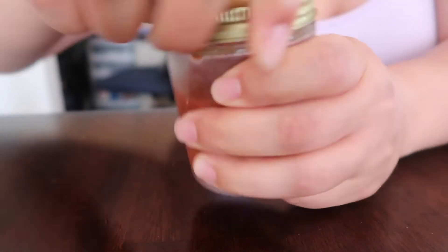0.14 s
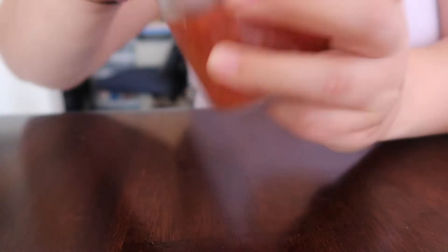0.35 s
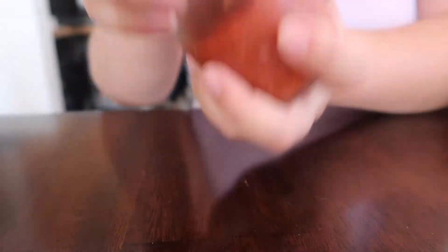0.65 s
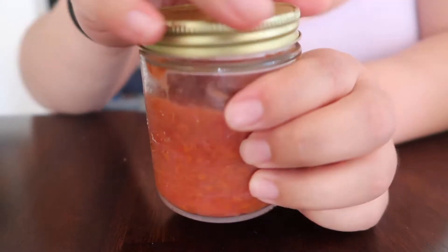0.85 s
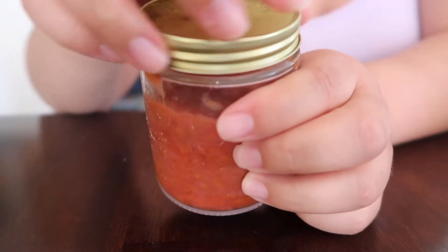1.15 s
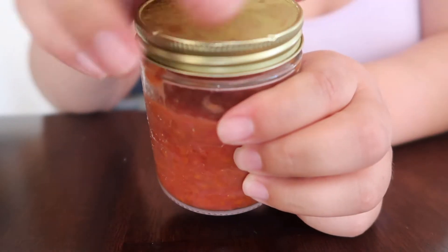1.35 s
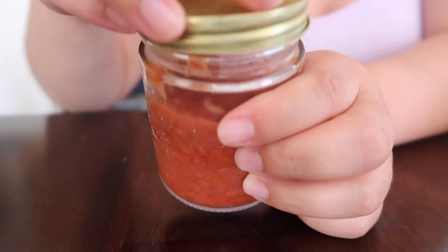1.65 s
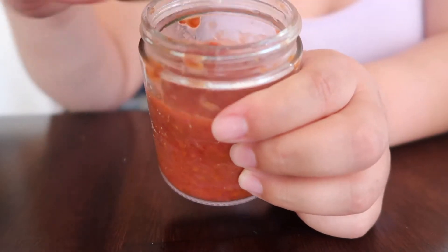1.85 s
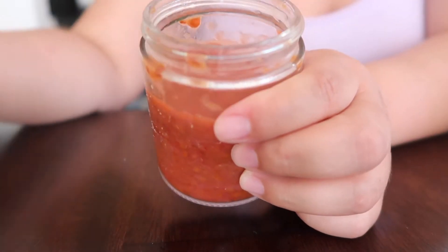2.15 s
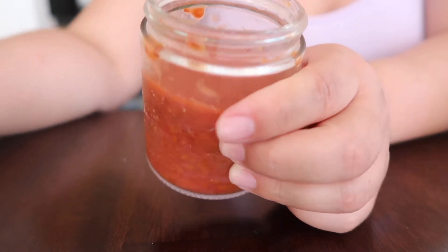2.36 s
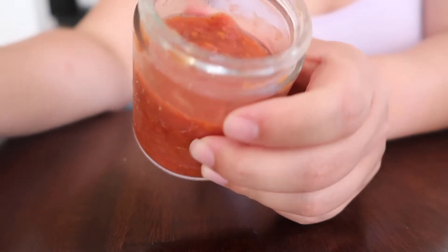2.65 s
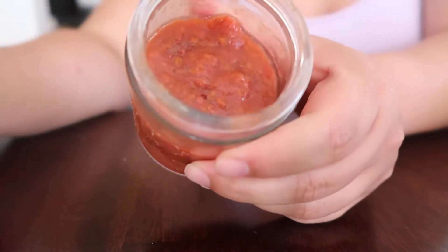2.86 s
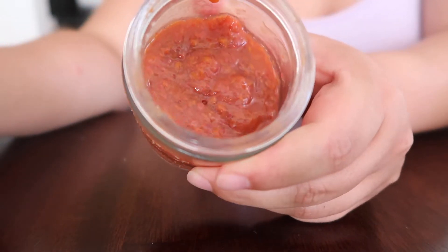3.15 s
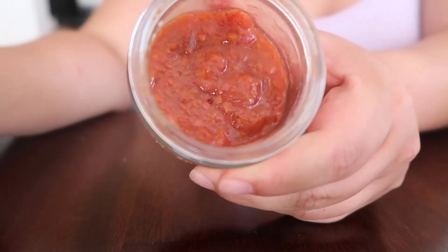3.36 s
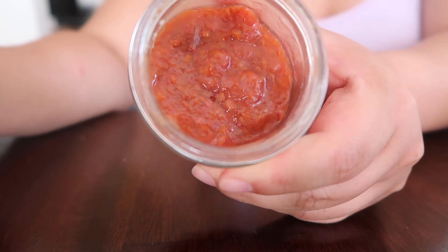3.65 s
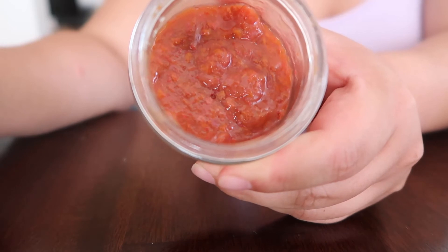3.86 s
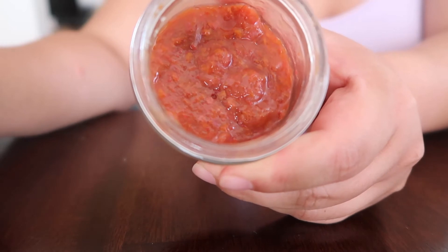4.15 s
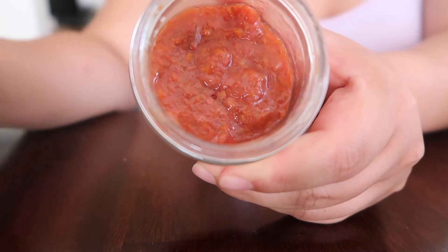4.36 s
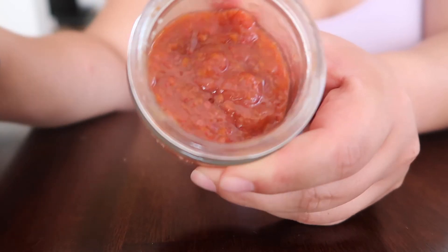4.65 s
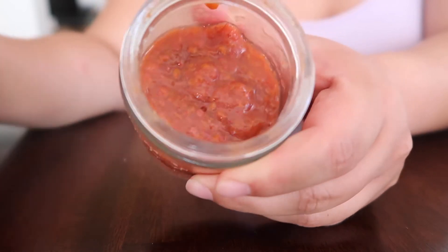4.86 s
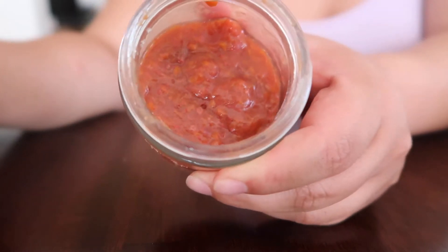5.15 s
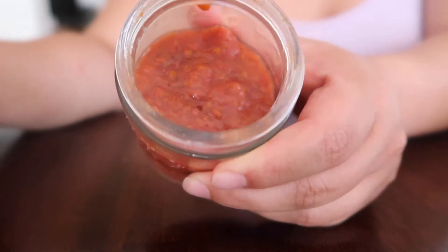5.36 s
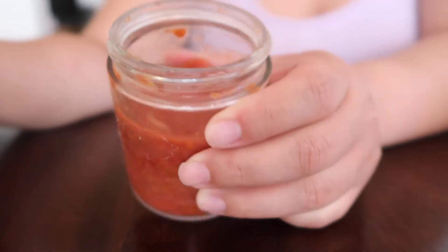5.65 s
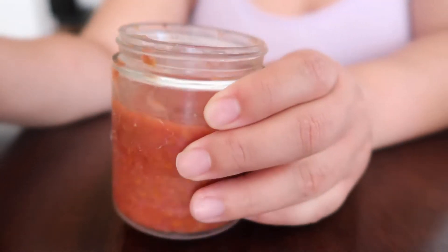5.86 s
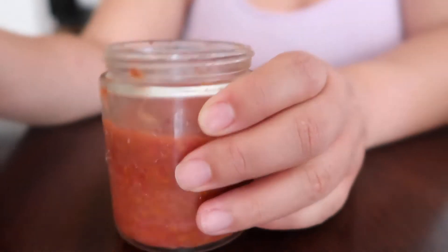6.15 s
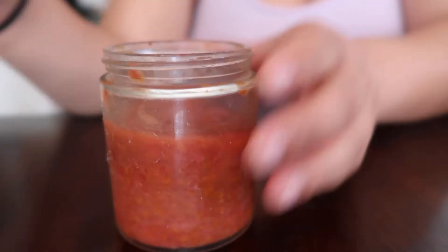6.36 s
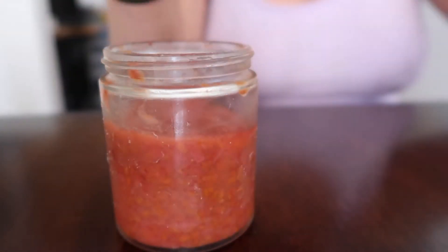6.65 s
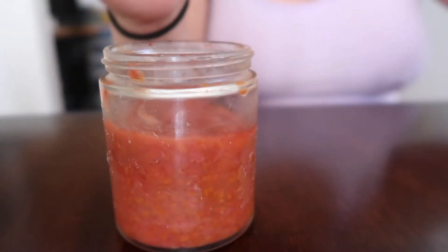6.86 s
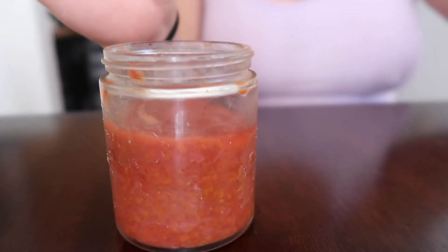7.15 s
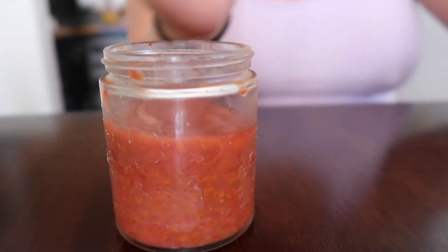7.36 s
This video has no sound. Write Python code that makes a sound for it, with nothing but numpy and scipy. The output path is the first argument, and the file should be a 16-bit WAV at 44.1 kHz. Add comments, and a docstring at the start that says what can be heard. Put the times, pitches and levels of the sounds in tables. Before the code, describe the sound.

In a small room, fingers tap lightly on a glass jar close to the microphone. Its metal lid twists in short grating jerks, clicks over the thread and clinks free. The lid lands on a wooden table, rolls on its ringing rim, tips over and wobbles faster and softer until it rests. The jar is then set down with two knocks, the second loud, and an arm softly bumps and brushes the wood.

```python
"""In a small room, fingers tap a glass jar of sauce and unscrew its metal lid.
The thread grates by stick-slip, catches on the glass ridges, and the lid clinks free.
The lid lands on a wooden table, rolls on its ringing rim, tips over and wobbles to rest.
The jar is set down with two knocks that ring the table top; an arm bumps and brushes the wood."""
import sys
import numpy as np
from scipy import signal
from scipy.fft import rfft, irfft, next_fast_len
from scipy.io import wavfile
from scipy.ndimage import uniform_filter1d, map_coordinates

SR = 44100
rng = np.random.default_rng(int(sys.argv[2]) if len(sys.argv) > 2 else 0)


def log_audio(samples):
    """Write samples as a 16-bit WAV file to the path given in sys.argv[1]."""
    # one column per channel
    frames = np.atleast_2d(samples).T
    # limit to full scale, then quantise
    limited = np.clip(frames, -1, 1)
    pcm = np.round(limited * 32767).astype(np.int16)
    wavfile.write(sys.argv[1], SR, pcm)


N = 330750

# Table levels are relative; each layer adds its own gain.
# Spectra: f/Hz, level/dB
ROOM_SPECTRUM = [(12, -28), (20, 3), (48, -8.5), (77, -8.5), (134, -8), (172, -15), (204, -8.5),
                 (319, -15.5), (558, -18), (738, -26.5), (1090, -25), (1220, -26), (10200, -45),
                 (14300, -53.5), (16000, -75.5)]
SIDE_OVER_MID = [(60, -35), (110, -24), (200, -15), (380, -7.5), (700, -6.5), (1290, -5.5), (2380, -2.5),
                 (4400, 0), (8120, 2), (15000, 10.5)]  # diffuse field
SKIN_SPECTRUM = [(88, -41), (150, -1), (171, -14), (275, -3), (515, -8.5), (3370, -9.5), (7200, -25),
                 (9220, -63), (14000, -82)]
WOOD_SPECTRUM = [(100, -27), (250, -1), (450, 2), (760, 4), (1100, -1), (1350, -7), (2000, -12),
                 (3100, -23), (4200, -29), (9000, -54), (16000, -86)]  # table's dense modes
# Reverberation: f/Hz, t60/s
ROOM_DECAY = [(100, 0.5915), (400, 0.48), (1300, 0.55155), (3000, 0.42), (10000, 0.38)]
# Phase between channels: f/Hz, phase/rad
JAR_PHASE = [(200, 0.024), (4000, 0.047), (7400, 1.39), (9500, 2.53), (14000, 1.84)]
LID_PHASE = [(200, 0.06), (1000, .22), (3000, .55), (4200, 1.35), (6000, 2.1), (8000, 2.85), (14000, 2.9)]

# Resonances: f/Hz, width/Hz, level/dB
TABLE_MODES = [(238.63, 28.27, 2.5), (345, 24, 3.5), (393, 10.4, 5.5), (455, 184, 5), (685, 170, 5.5),
               (801.39, 30, 5), (891, 30, 2), (1027, 78, -8), (1320, 170, -0.5), (1430, 110, -6),
               (1570, 220, -3), (2160, 430, -4.5), (2550, 89, -1.5), (3060, 210, -7.5), (4840, 2000, -22.5)]
GLASS_MODES = [(3160, 130, 5), (4480, 400, -18.5), (7337, 60, -24)]  # jar base, damped by the hand
THREAD_MODES = [(2680, 200, 1.5), (3070, 160, 1.5), (3440, 220, 0)]
CAPPED_MODES = [(285, 190, -7), (562, 176, 4.5), (750, 53, -3), (1014, 22, -6), (1203, 59, 7),
                (1880, 210, 1), (2290, 75, 5), (2495, 83, -3), (3170, 120, 1), (3275, 7.8, 8),
                (3300, 155, 1), (5300, 120, -16), (5830, 197, -15), (7200, 40, -12), (7640, 1900, -23),
                (13920, 1380, -15.5)]  # lid on the jar
LIFTED_MODES = [(1039, 38, 8), (1200, 34, 12.5), (1395.2, 1200, -5), (1790, 100, 2), (2178.4, 73.5, -12),
                (3240, 16, 1.5), (3090, 270, 1.5), (3600, 43, -6), (5340, 15, -6), (6000, 22.1, -15),
                (7360, 45.6, -1.5), (8300, 2300, -10.5), (13475, 2700, -17)]  # lid coming free
UPRIGHT_MODES = [(344, 28, -7), (507, 40, -2.5), (922, 64, -6.5), (1174, 40, -1), (1412, 35, -4.5),
                 (1637, 62, -0.5), (2170, 150, 2.5), (2467, 69, 5), (2640, 104, 1.5), (3260, 170, -7.5),
                 (3540, 53, -2.5), (4050, 68, -16), (4690, 50.88, -5.5), (5777.8, 2927.5, -10.5),
                 (6850, 49, 0), (7670, 40, -2), (8790, 56, 0)]  # lid on its edge
LYING_MODES = [(327, 78, -6.5), (511, 52, -4.5), (924, 80, -7.5), (1228, 57, -2.5), (1526, 260, -6.5),
               (2247, 180, 1), (2520, 120, 0), (3030, 300, -7), (3615, 60, -0.5), (4090, 150, -3),
               (4745, 66, -6.5), (7400, 2900, -8)]  # lid on the wood
PANEL_MODES = [(1184, 19, 0.5), (1460, 35, -8), (1960, 25, -3), (3240, 14, 4), (10900, 30, 0)]  # lid's flat top
# Clean partials of the lid: f/Hz, level/dB, t60/s
SKIRT_PARTIALS = [(522, -9, 0.028), (644, 0, 0.031), (1187, -8.5, .03)]
EDGE_PARTIALS = [(6896, -15, 0.64), (7800, -8, .1), (8800, -1, 0.078), (10800, -11, .12)]
RIM_PARTIALS = [(1500, -12, .008), (2223, 0, .024), (2370, -8, .016), (4100, -7, .018)]

# Fingertips on the jar: t/s, level/dB
FINGER_TAPS = [(0.186, -47.5), (0.2885, -51.5), (0.339, -52), (0.4345, -53), (6.5939, -56)]
# Hand and arm strokes: t/s, hold/s, wood/dB, glass/dB
STROKES = [(0.003, 0.01062, -64, -57.5), (0.121, 0.05857, -57.5, -72.5), (0.332, 0.00898, -50.5, -56),
           (0.43, 0.21, -58, -82), (6.599, 0.43, -59, -85.5), (7.052, 0.12, -48.5, -73),
           (7.218, 0.045, -43, -69.5), (7.385, 0.084, -52, -77)]
# Jar, last the forearm, on the table: t/s, level/dB, high cut/Hz, low cut/Hz, chatter/s, shove/dB, shove/Hz
TABLE_KNOCKS = [(6.0072, -14, 700, 150, 0.00015, -7, 385), (6.0200, -21, 620, 150, 0.0003, -9, 405),
                (6.0330, -35, 479, 150, 0.000719, -19, 353), (6.1850, -24, 1200, 200, .001, -30, 400),
                (6.1897, 1.5, 1450, 202, 0.001, -1, 452), (6.2008, -24, 1199, 202, 0.0023, -3.5, 363),
                (7.046, -34, 604, 103, 0.00373, -40, 201)]
# Lid on the table: t/s, level/dB, high cut/Hz, low cut/Hz, chatter/s, top slap/dB, edge ring/dB
LID_DROPS = [(2.4457, -14.5, 6198, 307, 0.001, -46, -26), (2.452, -18, 3500, 304.4, 0.0027, -51.5, -45),
             (2.472, -30, 3500, 897, .005, -55.5, -60), (2.485, -24, 4980, 398, 0.003, -52, -54),
             (2.507, -32, 3500, 900, .004, -60, -58), (2.7615, -11, 5000, 670, 0.00026, -29, -56),
             (2.778, -21, 4500, 592, 0.004, -41, -55), (2.7917, -20, 5976, 399, 0.0021, -46, -40.5),
             (2.824, -21.5, 4020, 400.8, 0.0024, -25, -56), (2.834, -22, 3990, 405, 0.005064, -40, -43),
             (3.485, -31, 7000, 800, .003, -51, -49), (5.018, -30.5, 3420, 1134, 0.00336, -55.5, -71)]
# Rim rolling on wood: t/s, hold/s, level/dB, attack/s, release/s
ROLL_RUNS = [(2.478, 0.25, -40.5, 0.03, 0.36), (2.80, 0.062, -38, 0.046, .25),
             (3.46, 0.00523, -48, 0.091, 0.233), (3.488, .003, -34.5, .01, 0.028),
             (3.63, 0.29, -42, 0.0561, 0.52), (4.485, 0.00488, -51.5, 0.1, 0.18)]
# Rim contacts of the wobble: t/s, level/dB, contact/s, high cut/Hz, rebound/dB, ping/dB
WOBBLE_SWINGS = [(3.602, -21, 0.0046, 4600, -13, -16.5), (3.654, -18, 0.0029, 4500, -8, -19.5),
                 (3.704, -21, 0.0033, 4500, -5, -25), (3.752, -23.5, 0.0042, 5000, -8, -26),
                 (3.7955, -25.5, .0025, 4300, -8, -33), (3.838, -22.5, 0.0032, 5200, -3, -31),
                 (3.878, -26.5, .0022, 5500, 0, -29), (3.914, -30, .0016, 3500, -7, -28.5),
                 (3.947, -38, 0.0022, 3500, -5, -38), (3.987, -28.5, 0.003, 3200, -14, -28.5),
                 (4.012, -32.5, .002, 3000, -6, -30.5), (4.052, -34.5, .0016, 2500, -19, -29.5),
                 (4.079, -38, .0012, 2200, -19, -31), (4.114, -42, .0011, 2000, -21, -33.5),
                 (4.139, -44.5, .0011, 2000, -20, -29.5), (4.170, -39.5, .0011, 2000, -22, -35),
                 (4.195, -45, 0.0015, 2000, -16, -33), (4.224, -43.5, .0012, 2000, -19, -36),
                 (4.242, -46, .0012, 2000, -18, -43), (4.267, -49, .0012, 2000, -18, -41),
                 (4.285, -46, .0012, 2000, -16, -42), (4.309, -48, 0.0013, 2000, -17, -42),
                 (4.327, -51, .0012, 2000, -20, -48), (4.345, -58, .0012, 2000, -19, -52),
                 (4.364, -50, 0.0011, 2000, -18, -49), (4.384, -54, .0012, 2000, -19, -50)]
# Air under the settling lid: t/s, level/dB
CAVITY_LEVEL = [(3.55, -84.5), (3.65, -52), (3.95, -55.5), (4.08, -49), (4.3, -54), (4.55, -85)]
# Hand turns: start/s, peak/s, end/s, swell columns as follows:
# grate/dB, effort swell/dB, rub/dB, rim/dB, rasp/dB, rub colour from/Hz, rub colour to/Hz
TURNS = [(0.691, 0.73, 0.81, -41, 5, -39, -36, -40, 1090, 1050),
         (0.794, 0.822, 0.86, -25.5, 11, -31.5, -25, -35.5, 420, 400),
         (0.974, 0.994, 1.058, -36.5, 4, -38.5, -42, -53.5, 431, 589),
         (1.097, 1.186, 1.216, -21.5, 25.5, -32, -30, -36, 1001, 800),
         (1.205, 1.225, 1.25, -37, 0, -40.5, -34, -41, 900, 750),
         (1.459, 1.537, 1.597, -39, 8, -33.5, -45, -45, 891, 650)]
# Thread catching on glass ridges: t/s, level/dB, high cut/Hz, low cut/Hz, chatter/s, skirt thud/dB
THREAD_CATCHES = [(0.794, -27.5, 9000, 3498, 0.01468, -60), (0.825, -17.5, 3600, 2201, 0.005, -29),
                  (0.838, -19, 2200, 1300, 0.004, -29), (0.876, -20.5, 2413, 396.5, 0.0066, -40),
                  (0.974, -31, 3000, 400.2, 0.003274, -42), (1.044, -28.5, 2580, 700, .005, -47.5),
                  (1.190, -14, 2300, 1300, .004, -41.5), (1.2524, -12.5, 3535, 298.6, 0.00073, -16.5),
                  (1.2565, -8.5, 6500, 1430, 0.0019, -42), (1.264, -11, 2512, 1201, 0.0066, -44.5),
                  (1.2833, -6.5, 2200, 252, 0.002, -18), (1.286, -23, 9000, 3983, 0.005484, -50),
                  (1.292, -14.5, 1893, 302.5, 0.003, -38), (1.479, -26.5, 4000, 900, 0.00243, -50),
                  (1.526, -30, 2500, 500, .005, -23), (1.567, -30, 2500, 500, .005, -29),
                  (1.599, -21, 5000, 2400, 0.0008, -15.5), (1.6405, -29, 1300, 400, 0.0018, -31),
                  (1.651, -30, 3497, 499.5, 0.003493, -34)]
# High mode of the loosened lid: t/s, hold/s, level/dB, attack/s, release/s
HIGH_RINGS = [(1.18, .02, -55, 0.091, 0.18), (1.251, .03, -41.5, .003, 0.078), (1.49, 0.18, -70, .1, .1)]
# Freed lid on the jar's mouth: t/s, level/dB, high cut/Hz, low cut/Hz, chatter/s
MOUTH_CLINKS = [(1.7253, -9.5, 5200, 895, 0.00025), (1.7273, -17.5, 4913, 886.5, 0.00081),
                (1.747, -42.5, 3000, 900, 0.00353)]


def amp(db):
    """Decibels to gain."""
    return np.exp(np.maximum(np.asarray(db, np.float32), -200) * np.float32(np.log(10) / 20))


def unit(x):
    """Scale to rms 1."""
    return x / np.sqrt(np.mean(x ** 2) + 1e-20)


def along(points, hz):
    """Read (f/Hz, value) points on a log axis."""
    f, v = np.transpose(points)
    return np.interp(np.log(hz + 1), np.log(f + 1), v)


def add(track, s, x):
    """Mix x into the track at time s."""
    part = track[round(s * SR):][:len(x)]
    part += x[:len(part)]


def swell(s, hold_s, db, attack_s, release_s):
    """Gain that rises until s, holds and falls; 30 dB per attack or release time."""
    t = np.arange(N, dtype=np.float32) / SR
    return amp(db - 30 * (np.maximum(s - t, 0) / attack_s + np.maximum(t - s - hold_s, 0) / release_s))


def wander(knots_per_s):
    """Smooth random curve."""
    knots = rng.standard_normal(int(N * knots_per_s / SR) + 4)
    return map_coordinates(knots, [np.arange(N) * knots_per_s / SR])


def filtered(x, response):
    """Apply a complex frequency response."""
    n, half = x.shape[-1], SR // 5
    impulse = np.roll(irfft(response(np.fft.rfftfreq(2 * half, 1 / SR))), half, axis=-1)
    m = next_fast_len(n + 2 * half, True)
    spectrum = rfft(x.astype(np.float32), m) * rfft(impulse.astype(np.float32), m)
    return irfft(spectrum, m)[..., half:half + n]


def body(modes, hz):
    """Causal response of a set of resonances."""
    hz = np.maximum(hz, 1).astype(np.float32)
    return sum(float((-1) ** k * amp(db)) / (1 + 1j * (hz - float(mode_hz ** 2) / hz) / float(width_hz))
               for k, (mode_hz, width_hz, db) in enumerate(modes))


def band(hz, low_hz, high_hz):
    """Causal band-pass, 12 dB/octave each side."""
    a, b = 1j * hz / low_hz, 1j * hz / high_hz
    return a * a / (1 + np.sqrt(2) * a + a * a) / (1 + np.sqrt(2) * b + b * b)


def narrow_noise(centre_hz, width_hz):
    """Noise around one resonance, rms 1."""
    return unit(filtered(rng.standard_normal(N), lambda hz: body([(centre_hz, width_hz, 0)], hz) ** 2))


def slips(per_s, spread_db):
    """Stick-slip impulses of uneven size at random times."""
    occurs = rng.random(N) < per_s / SR
    size = np.clip(rng.standard_normal(N, dtype=np.float32), -2, 2)
    return occurs * np.sign(rng.random(N, dtype=np.float32) - .5) * amp(spread_db * size)


def driven(force, modes, low_hz, high_hz):
    """A band-limited force rings a body; rms 1."""
    return unit(filtered(force, lambda hz: body(modes, hz) * band(hz, low_hz, high_hz)))


def struck(force, modes, low_hz, high_hz):
    """A short force rings a body; energy of 4 ms at rms 1."""
    return driven(force, modes, low_hz, high_hz) * np.sqrt(.004 * SR / len(force))


def strikes(rows, modes, chatter_db):
    """Each contact: one push, then brief chatter of the surfaces."""
    track, t = np.zeros(N), np.arange(SR // 4) / SR
    for s, db, high_hz, low_hz, chatter_s in rows:
        force = rng.standard_normal(len(t)) * np.exp(-t / chatter_s)
        force *= amp(chatter_db) / np.linalg.norm(force)
        force[0] += 1
        add(track, s, amp(db) * struck(force, modes, low_hz, high_hz))
    return track


def pings(rows, partials, scatter_db):
    """Decaying sines, started by each (t/s, level/dB) touch."""
    track, t = np.zeros(N), np.arange(SR // 2) / SR
    for s, db in rows:
        ring = 0
        for hz, partial_db, t60_s in partials:
            start_db = db + partial_db + scatter_db * rng.standard_normal()
            ring += amp(start_db - 60 * t / t60_s) * np.sin(2 * np.pi * hz * t)
        add(track, s, ring * (1 - np.exp(-t / 0.00044)))
    return track


def diffuse(pair):
    """Two unrelated signals to a stereo field, near mono in the bass."""
    def weights(hz):
        side_gain = amp(along(SIDE_OVER_MID, hz))
        return np.array([np.ones_like(hz), side_gain]) / np.hypot(1, side_gain)
    mid, side = filtered(pair, weights)
    return np.array([mid + side, mid - side])


def placed(x, phases, left_db, room_db, early_db, width):
    """Stereo direct sound, early echoes off table and body, room tail."""
    direct = filtered(x, lambda hz: np.exp(.5j * np.outer([1, -1], along(phases, hz))))
    hz, t, spectra = signal.stft(rng.standard_normal((2, SR // 2)), SR, nperseg=256)
    tail = signal.istft(spectra * amp(-60 * t / along(ROOM_DECAY, hz)[:, None]), SR, nperseg=256)[1]
    t = np.arange(tail.shape[1]) / SR
    tail *= 1 - np.exp(-(t / 0.00614) ** 2)
    early = rng.standard_normal(tail.shape) * t * np.exp(-t / 0.0099)
    echo = amp(room_db) * tail / np.linalg.norm(tail[0])
    echo += amp(early_db) * early / np.linalg.norm(early[0])
    echo = diffuse(echo * [[1], [width]])
    reverb = signal.oaconvolve(direct, echo.astype(np.float32), axes=1)[:, :N]
    return (direct + reverb) * amp([[left_db / 2], [-left_db / 2]])


def room_tone():
    """Steady low rumble with faint hiss."""
    noise = filtered(rng.standard_normal((2, N)), lambda hz: amp(along(ROOM_SPECTRUM, hz)))
    return amp(-45) * unit(diffuse(noise))


def hands():
    """Skin rustles on wood and hisses on glass; fingertips tick on the jar."""
    rustle = unit(filtered(slips(per_s=4000, spread_db=3.5), lambda hz: amp(along(SKIN_SPECTRUM, hz))))
    hiss_modes = [(3340.5, 390, 7), (4391, 1458, -9), (13500, 2000, -19)]
    hiss = driven(slips(per_s=3800, spread_db=7), hiss_modes, low_hz=2000, high_hz=7000)
    brush = np.zeros(N)
    for s, hold_s, wood_db, glass_db in STROKES:
        stroke = swell(s, hold_s, 0, attack_s=0.058, release_s=0.1216)
        brush += (amp(wood_db) * rustle + amp(glass_db) * hiss) * stroke
    taps = [(s, db, 6000, 3000, .0008) for s, db in FINGER_TAPS]
    return brush + strikes(taps, [(3478, 1015, 0)], chatter_db=7)


def table_thumps():
    """The top gives under each blow and springs back; the table booms on its legs."""
    shove, t = np.zeros(N), np.arange(SR // 20) / SR
    for s, *_, db, shove_hz in TABLE_KNOCKS:
        cycles = t * shove_hz
        add(shove, s, amp(db) * np.sin(2 * np.pi * cycles) * np.exp(-((cycles - .65) / 0.7) ** 2))
    leg_modes = [(44.67, 46, 13.8), (121, 11.7, 21.7), (235, 19, 1.8)]
    return shove + filtered(shove, lambda hz: body(leg_modes, hz))


def table_knocks():
    """Blows ring the table's main modes; the hardest also shakes its dense ones."""
    hardest_s = max(TABLE_KNOCKS, key=lambda knock: knock[1])[0]
    t = np.arange(N) / SR - hardest_s
    shake = unit(filtered(rng.standard_normal(N), lambda hz: amp(along(WOOD_SPECTRUM, hz))))
    shake = shake * np.clip(t / 0.00087, 0, 1) * np.exp(-np.abs(t) / 0.011)
    knocks = strikes([knock[:5] for knock in TABLE_KNOCKS], TABLE_MODES, chatter_db=-5)
    return amp(-4) * knocks + amp(-12) * shake


def jar_base():
    """The hardest knock also clinks the thick glass."""
    s, db, *_ = max(TABLE_KNOCKS, key=lambda knock: knock[1])
    return strikes([(s, db - 21, 7000, 2200, .0004)], GLASS_MODES, chatter_db=-13)


def rim_song():
    """The rolling lid rocks, so its main rim mode warbles and swells."""
    song_hz, width_hz = 2580, 210
    rock_hz, rock_bend, rock_db = 21, 0.034, 3
    rock = np.sin(2 * np.pi * np.cumsum(rock_hz * (1 + .15 * wander(10))) / SR)
    phase = 2 * np.pi * np.cumsum(song_hz * (1 + rock_bend * rock)) / SR
    a, b = filtered(rng.standard_normal((2, N)), lambda hz: 1 / (1 + 2j * hz / width_hz) ** 2)
    song = unit(a * np.cos(phase) + b * np.sin(phase)) * amp(rock_db * rock)
    return song * swell(2.5, hold_s=.21, db=-38.5, attack_s=0.002, release_s=0.32)


def wobble():
    """The lid swings on its rim, faster and softer, limping at the end; clatter thins to pings."""
    rebound_s, ping_lead_s = 0.0072, 0.00151
    track, t = np.zeros(N), np.arange(-SR // 50, SR // 4) / SR
    for s, db, contact_s, high_hz, rebound_db, _ in WOBBLE_SWINGS:
        # the contact travels round the rim and recolours each swing
        modes = [(hz * (1 + 0.014 * rng.standard_normal()), width_hz, mode_db + 2 * rng.standard_normal())
                 for hz, width_hz, mode_db in LYING_MODES]
        touch = np.exp(-np.abs(t) / contact_s)
        rebound = amp(rebound_db) * np.exp(-np.abs(t - rebound_s) / contact_s)
        force = (touch + rebound) * rng.standard_normal(len(t))
        add(track, s + t[0], amp(db) * struck(force, modes, low_hz=259.9, high_hz=high_hz))
    first_touches = [(s - ping_lead_s, ping_db) for s, *_, ping_db in WOBBLE_SWINGS]
    return track + pings(first_touches, RIM_PARTIALS, scatter_db=1)


def loose_lid():
    """The lid lands, rolls, slides with a faint squeak and wobbles to rest on a cushion of air."""
    rim = driven(slips(per_s=1700, spread_db=2), UPRIGHT_MODES, low_hz=279.69, high_hz=2767.7)
    rolling = rim * sum(swell(*run) for run in ROLL_RUNS) + rim_song()
    squeak = narrow_noise(3840, width_hz=107.5)
    squeak *= swell(3.52, hold_s=.05, db=-56, attack_s=.06, release_s=.05)
    cavity_db = np.interp(np.arange(N) / SR, *np.transpose(CAVITY_LEVEL), left=-120, right=-120)
    hum = narrow_noise(369, width_hz=43) * amp(cavity_db)
    knocks = strikes([drop[:5] for drop in LID_DROPS], UPRIGHT_MODES, chatter_db=-17)
    top_hits = [(s, slap_db, 4200, 600, .0009) for s, *_, slap_db, edge_db in LID_DROPS]
    slaps = strikes(top_hits, PANEL_MODES, chatter_db=9)
    edge = pings([(s, edge_db) for s, *_, edge_db in LID_DROPS], EDGE_PARTIALS, scatter_db=1.5)
    lid = wobble() + rolling + squeak + hum + knocks + slaps + edge
    return filtered(lid, lambda hz: band(hz, low_hz=99.5, high_hz=9500))  # wood softens each contact


def grip_drift(x, depth, knots_per_s):
    """The grip shifts, so the resonances drift in pitch."""
    return map_coordinates(x, [np.arange(N) + np.cumsum(depth * wander(knots_per_s))], mode="wrap")


def moving_contact(x, depth_db):
    """A moving contact point favours now one resonance, now another."""
    spectra = signal.stft(x, nperseg=256)[2]
    field = uniform_filter1d(rng.standard_normal(spectra.shape), size=3, axis=0)
    field = unit(uniform_filter1d(field, size=5, axis=1))
    return signal.istft(spectra * amp(depth_db * field - depth_db ** 2 / 10), nperseg=256)[1][:N]


def thread_friction():
    """Metal sticks and slips on glass in quick jerks; more effort gives a brighter grating."""
    fine = slips(per_s=1300, spread_db=3.5)
    ring = grip_drift(filtered(fine, lambda hz: body(CAPPED_MODES, hz)), depth=.012, knots_per_s=18)
    rasp = unit(filtered(fine, lambda hz: body(THREAD_MODES, hz) * band(hz, 2300, 3500) ** 2))
    grate = unit(filtered(ring, lambda hz: band(hz, 1534.3, 1990) * band(hz, 885, 2769.7)))
    rim = unit(filtered(ring, lambda hz: band(hz, 3084.5, 3637) * band(hz, 2584, 5500)))
    grit = driven(fine, [(4395, 2600, -0.5), (13500, 2300, -4)], low_hz=3479, high_hz=12001)
    coarse = slips(per_s=1800, spread_db=3)
    deep_rub = driven(coarse, CAPPED_MODES, low_hz=230.5, high_hz=565.4)
    high_rub = driven(coarse, [(990, 250, -16), (1280, 60, -21.5)], low_hz=499.45, high_hz=1400)
    effort_sag, glide_s, jerk_db = 0.73, 0.044, 1.4
    loudest_rim_db = max(turn[6] for turn in TURNS)
    track, t = np.zeros(N), np.arange(N) / SR
    for start_s, peak_s, end_s, grate_db, swell_db, rub_db, rim_db, rasp_db, from_hz, to_hz in TURNS:
        effort_db = np.interp(t, [start_s, peak_s, end_s], [-swell_db, 0, -effort_sag * swell_db])
        colour_hz = np.interp(t, [peak_s - glide_s, peak_s + glide_s], [from_hz, to_hz])
        high_share = np.interp(colour_hz, [400, 1100], [0, 1])
        rub = deep_rub * np.sqrt(1 - high_share) + high_rub * np.sqrt(high_share)
        turn = (grate * amp(grate_db + effort_db)
                + rasp * amp(rasp_db + effort_db)
                + rub * amp(rub_db + 0.42 * effort_db)
                + rim * amp(rim_db + 1.34 * effort_db)
                + grit * amp(-51.5 + 1.761 * (rim_db - loudest_rim_db + effort_db)))
        track += turn * swell(start_s, end_s - start_s, 0, attack_s=0.0082, release_s=0.024)
    track = moving_contact(track, depth_db=2)
    return track * amp(jerk_db * wander(knots_per_s=330) - jerk_db ** 2 / 10)


def unscrewing():
    """The thread grates and snaps over the ridges, the skirt drops on the glass, the lid clinks free."""
    friction = thread_friction()
    high_ring = narrow_noise(7320, width_hz=70) * sum(swell(*run) for run in HIGH_RINGS)
    thuds = pings([(s, thud_db) for s, *_, thud_db in THREAD_CATCHES], SKIRT_PARTIALS, scatter_db=4)
    snaps = strikes([catch[:5] for catch in THREAD_CATCHES], CAPPED_MODES, chatter_db=6)
    clinks = strikes(MOUTH_CLINKS, LIFTED_MODES, chatter_db=-1.5)
    return friction + high_ring + thuds + amp(-5) * snaps + amp(-4) * clinks


def scene():
    """Jar close to the microphone, loose lid to one side; the table top radiates into the room."""
    jar = unscrewing() + hands() + jar_base()
    jar = placed(jar, JAR_PHASE, left_db=0, room_db=-16, early_db=-14, width=.35)
    lid = placed(loose_lid(), LID_PHASE, left_db=2, room_db=-10, early_db=-13, width=.7)
    table = placed(table_knocks(), JAR_PHASE, left_db=1.1, room_db=-5.5, early_db=-3, width=0.23)
    return jar + lid + table + amp(-2.5) * table_thumps() + room_tone()


def record(dry):
    """Gain control ducks after peaks and recovers slowly; then soft saturation and a steep low-pass."""
    ceiling_db, recover_db_per_s, attack_s, top_hz = -2, 8, 0.004547, 15700
    over_db = np.maximum(20 * np.log10(np.abs(dry).max(axis=0) + 1e-9) - ceiling_db, 0)
    ramp_db = recover_db_per_s * np.arange(N) / SR
    duck_db = np.maximum.accumulate(over_db + ramp_db) - ramp_db
    pole = np.exp(-1 / (attack_s * SR))
    ducked = dry * amp(-signal.lfilter([1 - pole], [1, -pole], duck_db))
    saturated = ducked / (1 + ducked ** 4) ** (1 / 4)
    return filtered(saturated, lambda hz: 1 / np.sqrt(1 + (hz / top_hz) ** 120))


dry = scene()
out = record(dry)
log_audio(out)
```